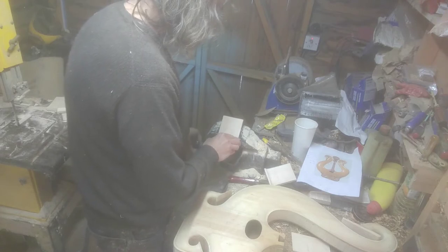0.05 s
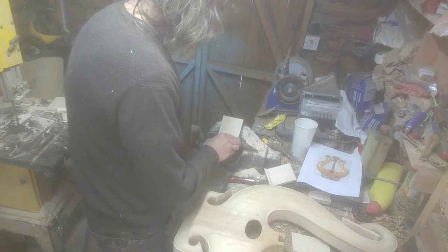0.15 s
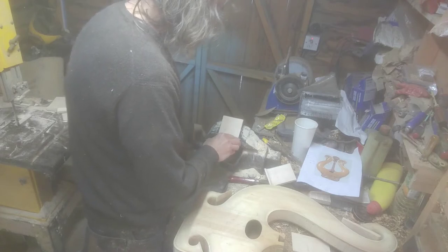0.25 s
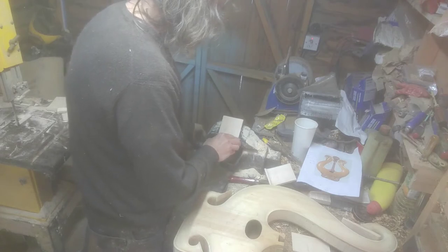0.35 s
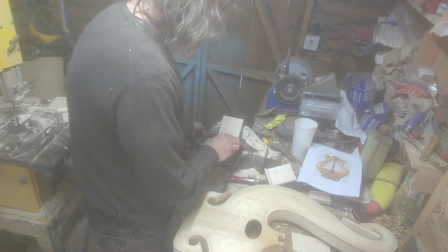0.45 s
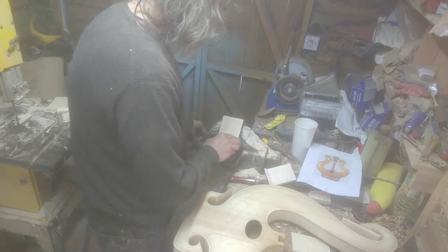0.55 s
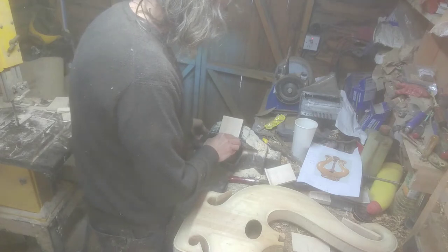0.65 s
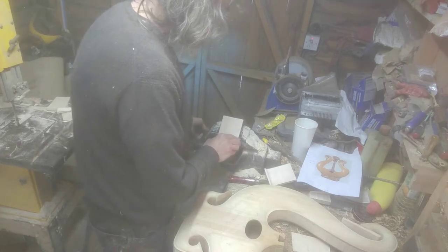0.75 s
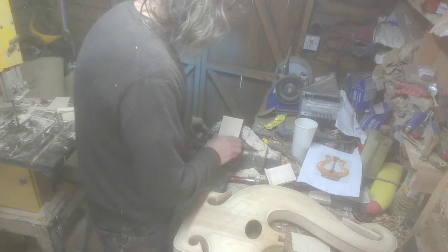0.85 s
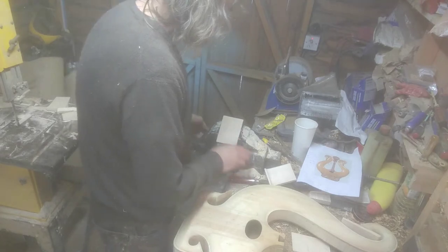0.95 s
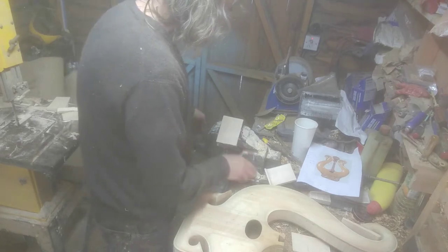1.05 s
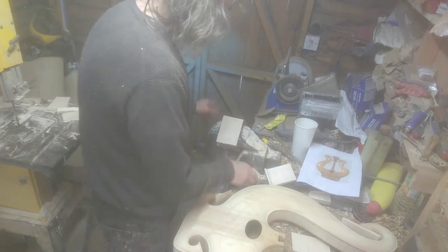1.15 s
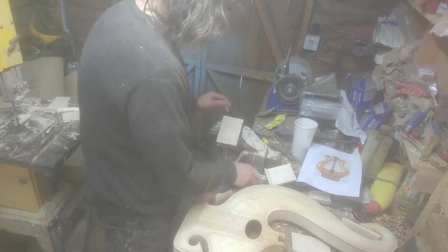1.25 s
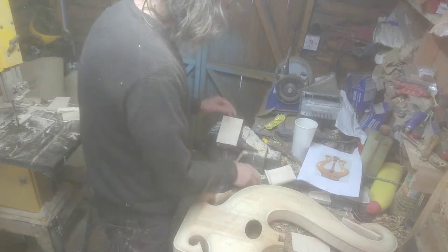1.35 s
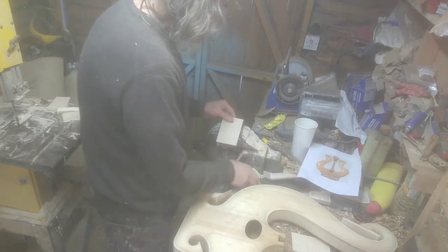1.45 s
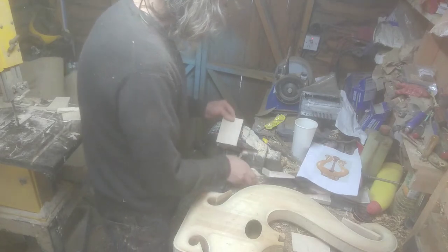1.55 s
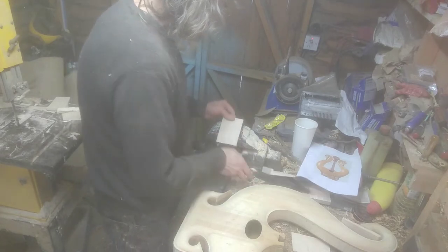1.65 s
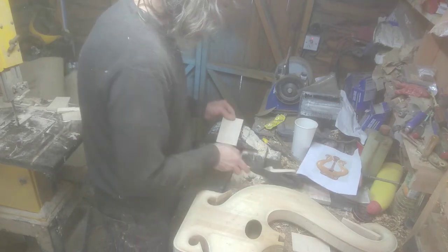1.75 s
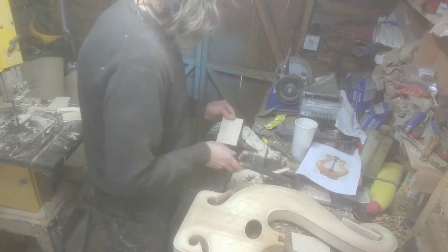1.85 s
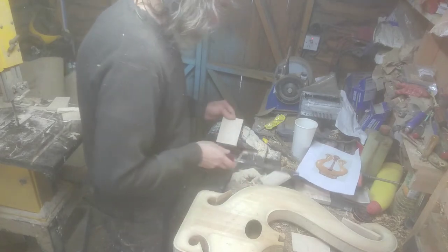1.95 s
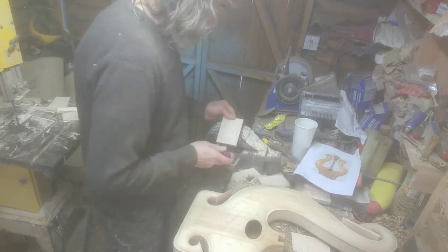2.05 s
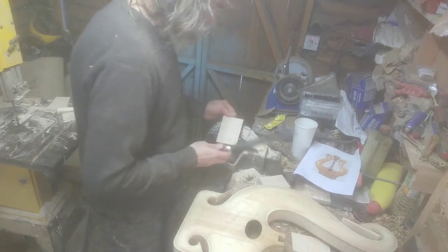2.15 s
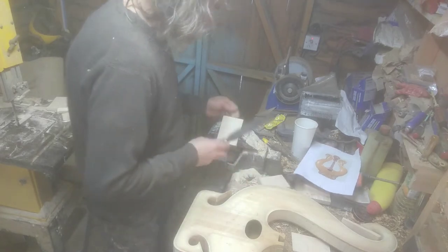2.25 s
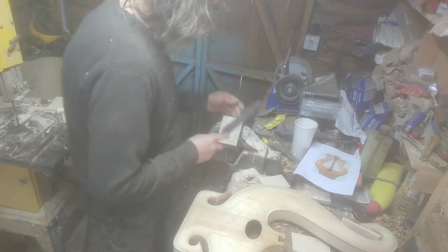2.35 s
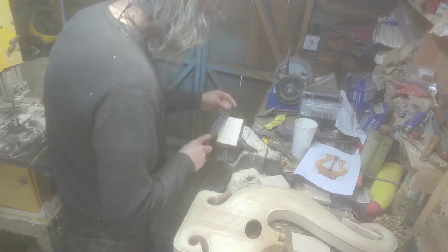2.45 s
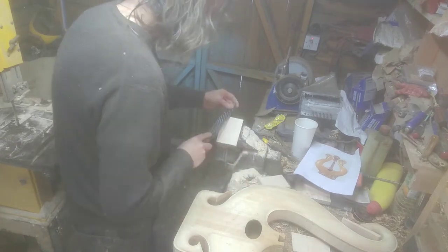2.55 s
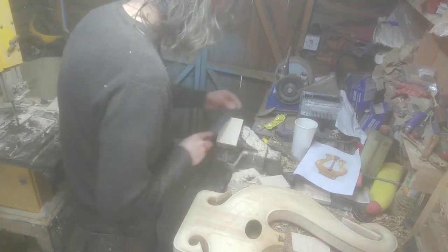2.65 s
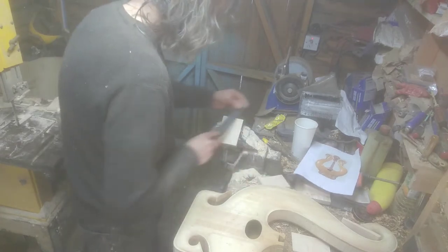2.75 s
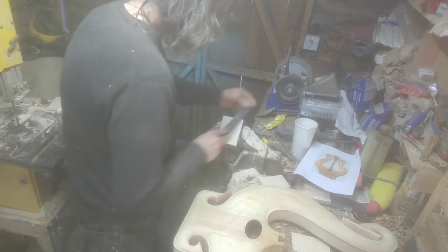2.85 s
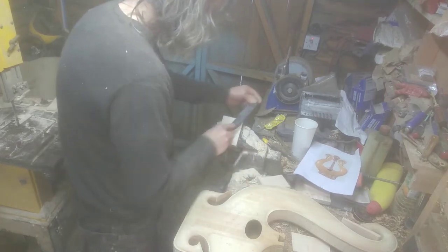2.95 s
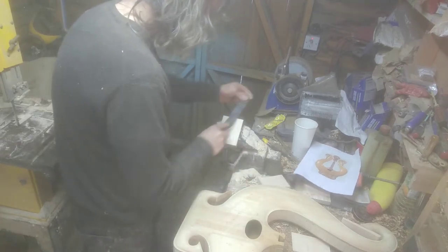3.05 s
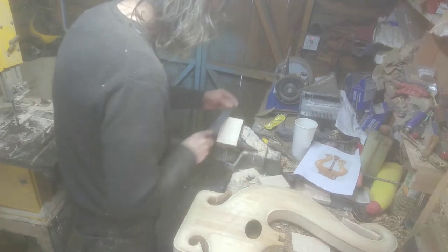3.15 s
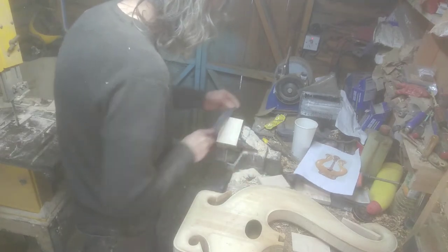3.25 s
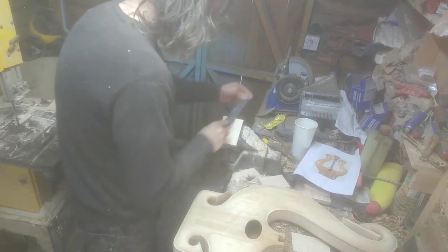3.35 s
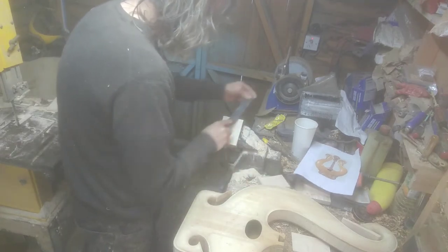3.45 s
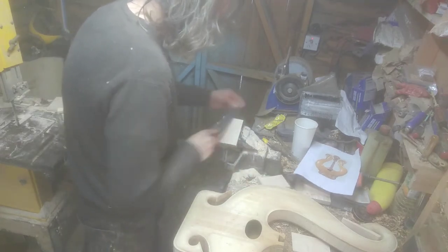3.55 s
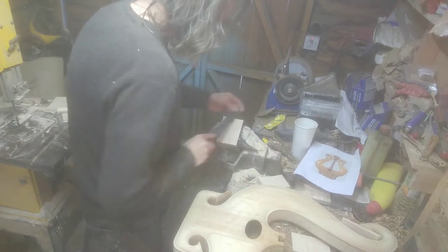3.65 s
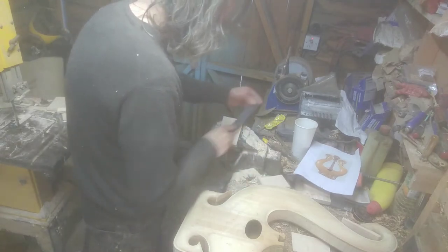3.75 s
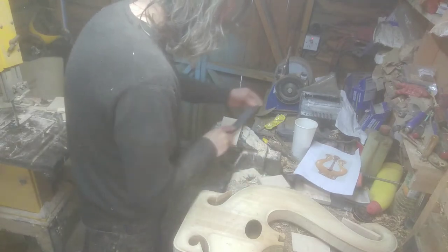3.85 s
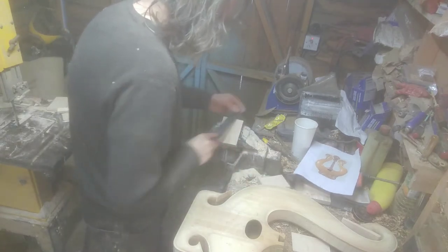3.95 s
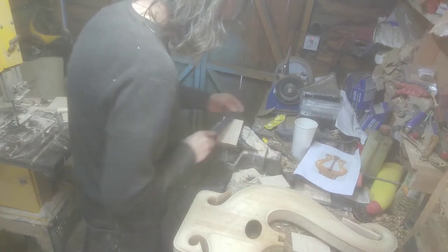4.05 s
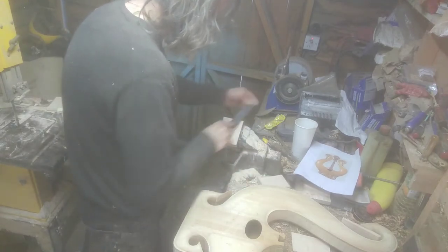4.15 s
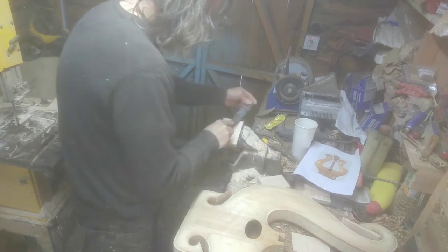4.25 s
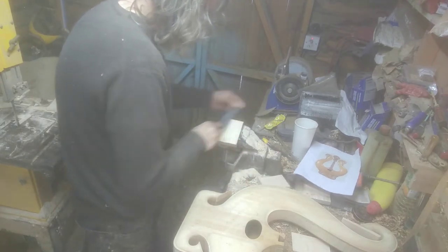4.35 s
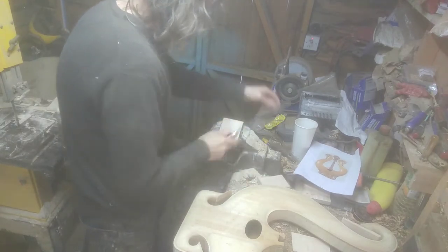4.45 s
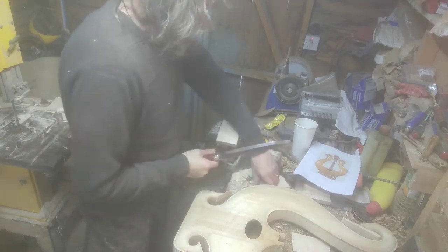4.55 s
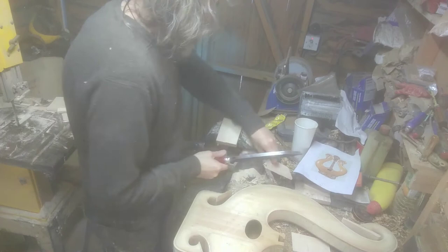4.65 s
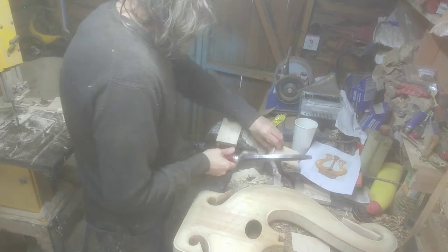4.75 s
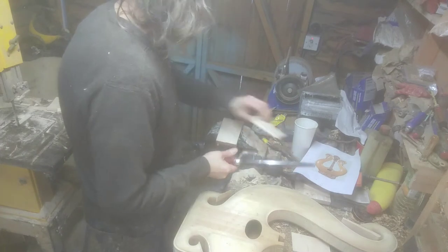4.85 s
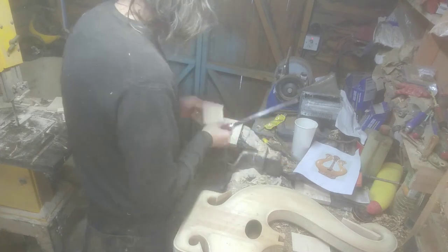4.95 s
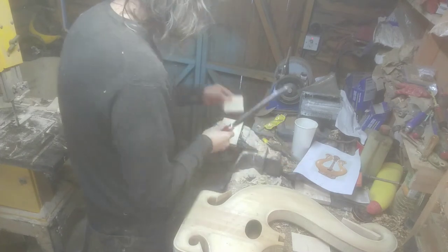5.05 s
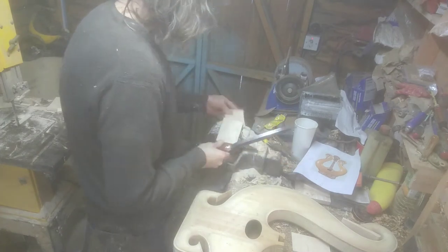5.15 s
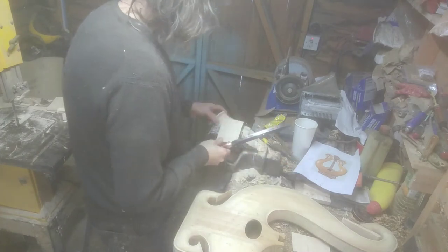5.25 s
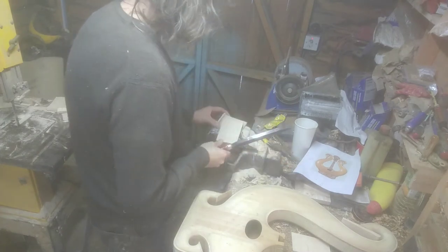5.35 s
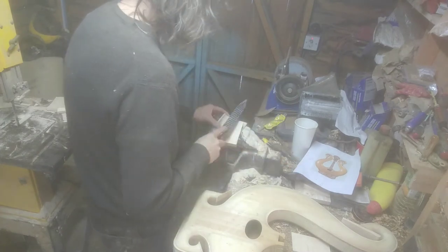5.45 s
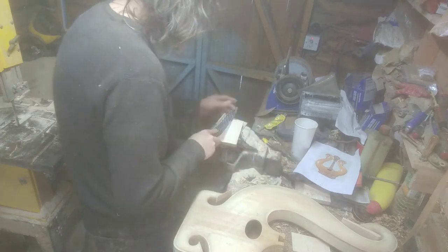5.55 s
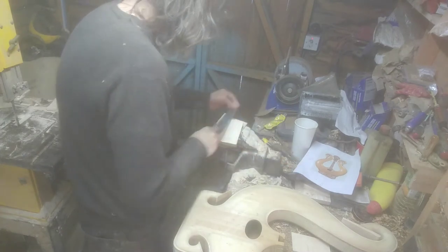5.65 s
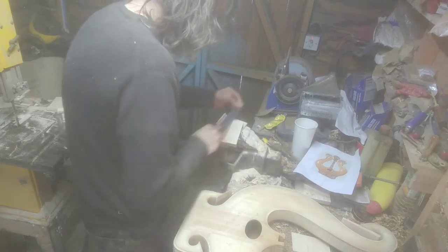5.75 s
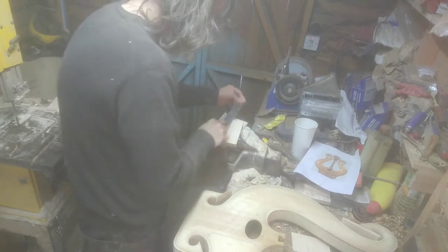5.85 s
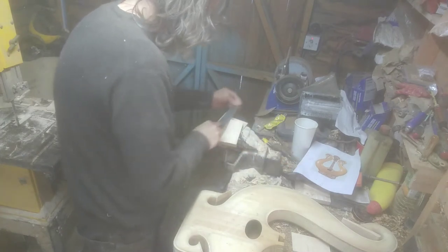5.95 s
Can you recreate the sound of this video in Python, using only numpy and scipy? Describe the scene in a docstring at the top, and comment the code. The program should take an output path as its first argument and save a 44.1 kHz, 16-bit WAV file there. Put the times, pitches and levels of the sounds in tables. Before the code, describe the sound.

Low traffic rumble first, then a woody knock and a second of loose tools scraping and clinking on a bench. Abruptly everything is sped up: quick hissing file strokes, first separate, then a dense alternating saw-like rhythm, a gap with clicks and faint slides, and a quieter final burst. Dry, short room echo, near microphone, thin bass in the fast part, and engine hum raised in pitch.

```python
"""A workshop bench near distant traffic: a tool is put down and another dug out of the clutter.
Then time runs five times faster and the background noise slides up in pitch: a hand file scrapes to and fro
on a small wooden piece, stops while an offcut is picked up and fitted, and starts again.
Scraping, sliding and rummaging are rains of tiny random catches that ring wood or metal;
knocks and taps are dying sines and noise, traffic is shaped noise with drifting engine notes."""
import sys
import numpy as np
from scipy import signal
from scipy.io import wavfile
from scipy.ndimage import uniform_filter1d

SR = 44100
rng = np.random.default_rng(int(sys.argv[2]) if len(sys.argv) > 2 else 0)


def gain_from_decibels(decibels):
    """Convert decibel values to linear amplitude factors."""
    exponent = np.asarray(decibels, float) / 20
    return 10 ** exponent


def dump_mix(stems):
    """Bounce the given channels to the path in sys.argv[1] as a 16-bit WAV at rate SR."""
    frames = np.atleast_2d(stems).T  # one column per channel
    limited = np.clip(frames, -1, 1)  # hard clip at full scale
    pcm = np.round(limited * 32767).astype(np.int16)
    wavfile.write(sys.argv[1], SR, pcm)


N = 264159
T = np.arange(N) / SR
FAST_FROM_S = 2.4  # from here on time runs fast

# dull resonances of the thud that strokes and taps share: f/Hz, width/Hz, relative level/dB
THUD_MODES = [(516, 115, -1.5), (766, 39, -3), (967, 85, -5), (1091, 38, -4), (1500, 340, -10.5),
              (1756, 360, -13), (2230, 310, -13)]


def stroke(middle_s, direction, db, thud_db, top_tooth_hz):
    """Teeth tear fibres in a dense rain of catches that swells with hand speed and rings file and wood."""
    # how a push runs (it dulls slightly) and how a pull runs (it brightens):
    # basic length/s, skew, treble skew, lean to the treble/(dB per octave),
    # treble on a rough edge/dB, treble on a smooth edge/dB
    push_run = (0.0623, 0.9, 0.92, -1, -8.5, -4)
    pull_run = (0.0446, 0.87, 0.9, 8, -9.5, -5)
    # middle and high resonances of file and clamped wood: f/Hz, width/Hz, relative level/dB
    body_modes = [(2700, 200, -13.5), (3200, 210, -10.5), (3700, 144, -5.5), (4372, 300, -2),
                  (4830, 89, -1), (5000, 103, -2), (5740, 110, -0.5), (5920, 115, -2), (6605, 103, 2),
                  (7020, 160, 0.5), (7600, 380, -4.5), (7830, 320, -2)]
    treble_modes = [(8990, 390, -5), (9300, 370, -2), (10010, 460, -3), (10800, 320, -5),
                    (11150, 180, -4.5), (11840, 760, -12), (13050, 600, -9), (13900, 300, -6),
                    (14600, 500, -7.5), (15150, 300, -9), (15650, 350, -8.5)]
    # resonances of the clamp: f/Hz, width/Hz, relative level/dB
    clamp_modes = [(993, 77, 0), (1170, 120, -1)]
    pushing = direction > 0
    length_s, skew, treble_skew, lean_db, rough_db, smooth_db = push_run if pushing else pull_run
    length_s -= 0.0008 * (db + 35)  # hard strokes are quick
    if middle_s > 5:
        length_s *= 0.9  # shorter strokes after the piece is refitted
    size = round(length_s * SR)
    u = np.linspace(0, 1, size)  # progress through the stroke

    # the burr wears off: the edge goes from rough (0) to smooth (1) and the hiss brightens
    half_smooth_s, smoothing_s = 3.19 if pushing else 3.5, 0.12
    smooth = 1 / (1 + np.exp((half_smooth_s - middle_s) / smoothing_s))
    treble_db = rough_db + (smooth_db - rough_db) * smooth

    uneven_bite = gain_from_decibels(2.0 * evened(uniform_filter1d(rng.standard_normal(size), 90)))
    teeth = grit(size, 12000, 1.16) * uneven_bite
    speed = np.sin(np.pi * u ** skew)
    # teeth pass at a rate that arches with the speed, and that rasp sweeps through the modes
    rasp = evened(glide(teeth, top_tooth_hz * speed ** 0.83, 480))

    modes_hz = np.transpose(body_modes)[0]
    octaves = np.log2(modes_hz / 5000)
    tilt_db = 1.68 * (treble_db + 5) * octaves  # dull strokes reach the lower modes
    # modes close to the top tooth rate are driven harder
    near_db, near_octaves = 2.5, 0.12
    tilt_db += near_db * np.exp(-(np.log2(modes_hz / top_tooth_hz) / near_octaves) ** 2)
    drive = evened(teeth + gain_from_decibels(-14.0) * rasp) * gain_from_decibels(-1.0) * bite(speed)
    low = wandering(drive, body_modes, 3, 3.1, tilt_db, lean_db * octaves)
    low[:size] += gain_from_decibels(-10.5) * rasp * speed ** 1.28
    treble_speed = np.sin(np.pi * u ** treble_skew)
    high = wandering(teeth * gain_from_decibels(-1.0) * bite(treble_speed), treble_modes, 2, 0.88, 0)

    # the clamp is jolted as the teeth bite and as they let go, harder on a rough edge
    jolts = np.exp(-((u - .27) / 0.068) ** 2) + 1.2 * np.exp(-((u - .72) / 0.033) ** 2)
    thud = gain_from_decibels(5 - 5 * smooth) * signal.fftconvolve(grit(size, 4000, 3.0) * jolts, peaks(clamp_modes))
    # the bench shudders throughout
    shudder = grit(size, 4000, 2.8) * np.sin(np.pi * u) ** 0.66
    thud += gain_from_decibels(-3 + 2.5 * smooth) * wandering(shudder, THUD_MODES, 2, 3.4, 0)
    sound = gain_from_decibels(db) * (low + gain_from_decibels(treble_db) * high + gain_from_decibels(thud_db) * thud)
    return middle_s - length_s / 2, sound


def bite(speed):
    """How hard the teeth cut at a hand speed of 0-1; once they bite fully, more speed adds little."""
    grip = 1
    return np.tanh(grip * speed ** 3.66) / np.tanh(grip)


def rummage():
    """A tool drags through clutter: clumped catches ring loose tools in turn, shake the bench and rustle."""
    # the drag through the clutter: t/s, effort/dB, brightness/dB
    drag = [(1.42, -86, -2), (1.432, -51, -22), (1.458, -68.5, 3), (1.552, -52, -3), (1.576, -41, -1),
            (1.668, -56, -5.5), (1.748, -64.5, -3), (1.886, -47.5, 0.5), (1.978, -44, 0.5),
            (2.04, -46.5, -1), (2.142, -75, 6.5), (2.182, -66.5, 5.5), (2.302, -53, 0.5), (2.387, -46, 7),
            (2.41, -70, 2.5)]
    # resonances of the clutter: f/Hz, width/Hz, relative level/dB
    clutter_modes = [(566, 81, 2.5), (824, 115, 1.5), (1101, 20, 5), (1650, 170, -2.5), (1800, 93, -7),
                     (2080, 150, -13)]
    # resonances of the metal tools: f/Hz, width/Hz, relative level/dB
    metal_modes = [(2410, 25, 6), (2700, 550, 3), (3150, 65, -16), (3800, 66, 4), (4120, 71, -23),
                   (4840, 67, 2.5), (5250, 160, -7)]
    s, effort_db, bright_db = np.transpose(drag)
    t = np.arange(s[0], s[-1], 1 / SR)
    size = len(t)
    clumps = gain_from_decibels(2.8 * evened(uniform_filter1d(rng.standard_normal(size), 500)))
    catches = evened(grit(size, 1800, 2.9) * clumps)

    rattle = wandering(catches, clutter_modes, 16, 2.1, 0)[:size]
    rattle += gain_from_decibels(-1.0) * evened(band(catches, 235, 1450))
    shake = band(band(catches, 117, 370), 102, 254)
    scrape = wandering(catches, metal_modes, 16, 6.0, 0)[:size]
    scrape += gain_from_decibels(5.0) * evened(band(catches, 2080, 3970))
    rustle = band(band(catches, 6200, 11200), 6200, 24000)

    shake_db = -51 + 0.39 * (effort_db + 51)  # the bench follows the effort only in part
    scrape_db = effort_db - 7.5 + bright_db
    rustle_db = effort_db - 23.5 + 2.57 * bright_db
    sound = np.zeros(size)
    for layer, db in ((rattle, effort_db), (shake, shake_db), (scrape, scrape_db), (rustle, rustle_db)):
        sound += gain_from_decibels(np.interp(t, s, db)) * evened(layer)
    return s[0], sound


def rub(s, length_s, hz, width_hz, db):
    """A dragged tool rings one note for a moment: catches pass through a narrow resonance."""
    size = round(length_s * SR)
    pitch = np.full(size, hz)
    note = glide(grit(size, 1900, 2.9), pitch, width_hz)
    note = evened(glide(note, pitch, 3 * width_hz))
    return s, gain_from_decibels(db) * note * signal.windows.tukey(size, .4)


def knock(s, db, thump_db, top_hz):
    """A blow thumps the bench and its crumbly rattle rings higher modes; each has its own upper limit in pitch."""
    # resonances of the bench: f/Hz, relative level/dB, time to fall 60 dB/s
    bench_modes = [(76, -10, 0.34), (148, -10.5, 0.13), (229.6, 1.5, 0.092), (380, -5.5, 0.093),
                   (460, -7, 0.12), (554, -5.5, 0.069), (780, 1.5, 0.025), (950, -6, 0.066),
                   (1106, 0, 0.022), (1307, -1.5, 0.036), (1500, 1, 0.019), (2305, -3.5, 0.026),
                   (3200, -20, 0.044), (4130, -9.5, 0.055)]
    size = 6000
    hz, mode_db, t60 = np.transpose(bench_modes)
    low = hz < 300
    rattle = grit(3000, 2100, 3.5) * gain_from_decibels(-20.5 - 60 * T[:3000] / 0.11)
    rattle[0] = 1  # the first contact
    rung = signal.fftconvolve(ring(hz[~low], t60[~low], mode_db[~low], size), rattle)[:size]
    rung = gain_from_decibels(db + 1.5) * rung / abs(rung).max()
    thump = ring(hz[low], t60[low], mode_db[low] + thump_db, size)
    crumble = rng.standard_normal(size) * gain_from_decibels(db - 11 - 60 * T[:size] / 0.12)
    return s, band(band(rung + thump + crumble, 60, top_hz), 68, 1.26 * top_hz)


def tap(s, db, hz, t60, thud_db):
    """A small dry piece lands with a chatter: a crack, short modes and a thud in the bench."""
    # resonances of the offcut: multiple of the main pitch, relative level/dB
    offcut_modes = [(.66, -11), (.83, -13), (1, 0), (1.2, -14), (1.5, -15), (1.8, -15), (2.05, -19),
                    (2.55, -17), (3.3, -22)]
    size = 1500
    ratio, mode_db = np.transpose(offcut_modes)
    mode_t60 = t60 / (1 + 0.5 * abs(np.log2(ratio)))  # modes away from the main pitch die sooner
    modes = ring(np.minimum(hz * ratio, 15500), mode_t60, mode_db, size)
    chatter = grit(300, 3000, 3.3) * gain_from_decibels(-16 - 60 * T[:300] / 0.045)
    chatter[0] = 1  # the first contact
    rung = signal.fftconvolve(modes, chatter)[:size]
    crack = band(rng.standard_normal(size), 1050, 2.0 * hz) * gain_from_decibels(1.5 - 60 * T[:size] / 0.031)
    thud = peaks(THUD_MODES)
    return s, gain_from_decibels(db) * (rung + crack + gain_from_decibels(thud_db) * thud / abs(thud).max())


def slide(s, length_s, db, ring_db, hz):
    """Something slides: fine catches hiss around a middle pitch and may ring the offcut."""
    # resonances of the sliding offcut: f/Hz, width/Hz, relative level/dB
    sliding_modes = [(3290, 110, 0), (6540, 110, -11), (7800, 200, -22), (11300, 120, -19)]
    size = round(length_s * SR)
    catches = grit(size, 12000, 2.5) * signal.windows.tukey(size, .6)
    rung = signal.fftconvolve(catches, peaks(sliding_modes))[:size]
    span = 1.3  # the hiss reaches this ratio above and below its middle
    hiss = evened(band(catches, hz / span, hz * span))
    return s, gain_from_decibels(db) * (gain_from_decibels(ring_db) * rung + hiss)


def room(x, t60, db):
    """Sparse reflections of random sign dying away."""
    at = np.arange(60, 12000, 10) + rng.integers(0, 10, 1194)  # one reflection every 10 samples or so
    tail = np.zeros(12100)
    tail[at] = rng.choice([-1., 1.], len(at)) * gain_from_decibels(-60 * at / SR / t60)
    return x + gain_from_decibels(db) * signal.fftconvolve(x, tail / np.linalg.norm(tail))[:N]


def drone(s, length_s, first_hz, last_hz, db):
    """A distant engine swells up and fades: one sine that drifts in pitch and wavers a little."""
    size = round(length_s * SR)
    waver = uniform_filter1d(uniform_filter1d(rng.standard_normal((2, size)), 1500), 1500)
    pitch_waver, level_waver = evened(waver)
    turns = np.cumsum(np.linspace(first_hz, last_hz, size) * (1 + 0.0037 * pitch_waver)) / SR
    swell = signal.windows.tukey(size, 0.44)  # share of the length spent rising and falling
    return s, swell * gain_from_decibels(db + 0.93 * level_waver) * np.sqrt(2) * np.sin(2 * np.pi * turns)


def air():
    """Traffic rumble and microphone hiss: shaped noise whose spectrum slides up when time speeds up."""
    # spectrum of the noise at the slow pace: f/Hz, relative level/(dB per Hz)
    air_spectrum = [(12, -31.5), (30, -32.5), (42, -14), (60, -2.5), (80, -0.5), (100, -8), (125, -18),
                    (160, -19.5), (220, -25), (450, -30.5), (900, -27), (2000, -42), (5000, -52),
                    (10500, -58.5), (12500, -49), (15500, -57)]
    # swells of the background: t/s, level change/dB
    swells = [(0, -1.5), (1.2, 0), (1.8, 4), (2.4, 1.5), (3, 5), (3.7, 3), (5.5, -1), (5.99, 5)]
    hz, frames = np.fft.rfftfreq(2048, 1 / SR), N // 512 + 5
    f, db = np.transpose(air_spectrum)
    noises = []
    for speed in (1, 5):  # slow time, fast time
        z = rng.standard_normal((frames, 1025)) + 1j * rng.standard_normal((frames, 1025))
        z *= gain_from_decibels(np.interp(np.log(hz / speed + 1), np.log(f + 1), db))
        noise = signal.istft(z.T, nperseg=2048, noverlap=1536)[1][:N]
        noises.append(evened(noise))
    slow, fast = noises
    level = gain_from_decibels(-53 + np.interp(T, *np.transpose(swells)))
    return level * np.where(T < FAST_FROM_S, slow, fast)


def evened(x):
    """Scales to rms 1."""
    return x / np.sqrt(np.mean(x ** 2) + 1e-20)


def add(mix, s, sound):
    """Lays a sound into the mix at a time in seconds."""
    part = mix[round(s * SR):][:len(sound)]
    part += sound[:len(part)]


def band(x, lo_hz, hi_hz):
    """Band-pass: keeps what lies between two pitches."""
    return signal.sosfilt(signal.butter(2, [lo_hz, min(hi_hz, .49 * SR)], "band", fs=SR, output="sos"), x)


def grit(size, per_s, spread_db):
    """Random catches of uneven strength and random sign, scaled to rms 1."""
    strength = gain_from_decibels(spread_db * np.minimum(rng.exponential(1, size), 4)) * rng.choice([-1., 1.], size)
    return evened(strength * (rng.random(size) < per_s / SR))


def ring(hz, t60, db, size):
    """Sum of dying sines; neighbours start in opposite directions."""
    t = np.arange(size)[:, None] / SR
    return (gain_from_decibels(db - 60 * t / t60) * np.sin(2 * np.pi * hz * t)) @ (-1.) ** np.arange(len(hz))


def peaks(rows, more_db=0):
    """What a struck set of resonances rings, narrow ones for longer, scaled to energy 1."""
    hz, width, db = np.transpose(rows)
    # a wide resonance dies fast, so it starts louder to reach the same height in the spectrum
    start_db = db + more_db + 20 * np.log10(width)
    response = ring(hz, 1.8 / np.clip(width, 10, None), start_db, size=1500)
    return response / np.linalg.norm(response)


def wandering(x, rows, parts, spread_db, more_db, lean_db=0):
    """The contact point moves: overlapping parts of x each ring the modes with a new balance."""
    place, out = np.linspace(0, parts - 1, len(x)), 0
    for k in range(parts):
        balance_db = spread_db * rng.standard_normal(len(rows)) + more_db
        balance_db = balance_db + lean_db * (k / (parts - 1) - .5)
        fade = np.cos(np.pi / 2 * np.clip(place - k, -1, 1))
        out = out + signal.fftconvolve(x * fade, peaks(rows, balance_db))
    return out


def glide(x, hz, width_hz):
    """A resonance that follows the curve hz: shift down to zero, smooth, shift back."""
    turn = np.exp(2j * np.pi * np.cumsum(hz) / SR)
    r = np.exp(-np.pi * width_hz / SR)
    return 2 * (turn * signal.lfilter([1 - r], [1, -r], x / turn)).real


def scene():
    """Slow handling, then the hurried filing, each in the same room at its own pace."""
    # file strokes: middle t/s, direction (1 push, -1 pull), level/dB, wood thud/dB, top tooth rate f/Hz
    strokes = [(2.543, 1, -30.5, -10, 3330), (2.635, 1, -31, -9.5, 6600), (2.726, 1, -30.5, -11.5, 6760),
               (2.819, 1, -31.5, -11.5, 5800), (2.908, 1, -31.5, -13, 7440), (2.96, -1, -36, -12.5, 7050),
               (2.999, 1, -32, -12.5, 7000), (3.046, -1, -33.5, -8, 3998), (3.077, 1, -31.5, -11.5, 5900),
               (3.125, -1, -36, -8, 4000), (3.159, 1, -33, -11.5, 4450), (3.203, -1, -36.5, -10, 3200),
               (3.242, 1, -34, -10, 4600), (3.286, -1, -36.5, -12.5, 3150), (3.321, 1, -33, -12.5, 4756),
               (3.365, -1, -36, -12, 6700), (3.403, 1, -33.5, -13.5, 6750), (3.445, -1, -35, -19, 4640),
               (3.482, 1, -32.5, -17, 6500), (3.524, -1, -35, -17, 5000), (3.563, 1, -35, -13.5, 6730),
               (3.605, -1, -34.5, -18, 6700), (3.645, 1, -34.5, -13.5, 6870), (3.686, -1, -35, -17, 6900),
               (3.724, 1, -34.5, -13.5, 6640), (3.765, -1, -35.5, -17.5, 6500),
               (3.803, 1, -34.5, -12.5, 4740), (3.841, -1, -37.5, -9.5, 4400), (3.878, 1, -35, -11.5, 7000),
               (3.922, -1, -37, -14.5, 4430), (3.96, 1, -35.5, -15, 6750), (4.0, -1, -36.5, -18, 6900),
               (4.04, 1, -35, -14.5, 5470), (4.084, -1, -36, -17.5, 6700), (4.122, 1, -34, -15, 7000),
               (4.167, -1, -34.5, -14, 6930), (4.204, 1, -34.5, -14, 6540), (4.247, -1, -32, -18.5, 6500),
               (4.286, 1, -34, -14, 6800), (4.328, -1, -35, -14.5, 5000), (4.368, 1, -35, -13, 6040),
               (4.409, -1, -36.5, -14.5, 4350), (4.451, 1, -34.5, -16.5, 6150),
               (5.663, 1, -41, -11.5, 6370), (5.702, -1, -39, -15.5, 4320), (5.738, 1, -36.5, -17, 6700),
               (5.779, -1, -39.5, -9.5, 5000), (5.814, 1, -39, -11, 5100), (5.858, -1, -40.5, -7.5, 5000),
               (5.887, 1, -38, -9, 4830), (5.936, -1, -39.5, -7.5, 6550), (5.969, 1, -37, -8.5, 6650)]
    # tools knock on the bench: t/s, level/dB, low thump/dB, top f/Hz
    knocks = [(1.152, -38, -43.5, 1800), (1.199, -30.5, -56, 1630), (1.205, -25.5, -24, 3200),
              (1.428, -39.5, -44, 1270), (1.568, -39.5, -49, 3600), (1.712, -39, -45, 1150),
              (1.788, -47, -55, 3000), (2.042, -39, -52, 3000), (2.164, -49, -63, 6020),
              (2.184, -41.5, -54, 6000)]
    # single notes of a dragged tool: t/s, length/s, f/Hz, width/Hz, level/dB
    rubs = [(1.445, 0.24, 728, 86, -52), (1.481, 0.09, 2700, 100, -71), (1.493, 0.11, 3800, 39, -67),
            (1.848, 0.086, 1500, 122, -51), (1.904, 0.043, 925, 47, -49), (1.942, 0.075, 3150, 125, -52),
            (1.998, 0.041, 2410, 39, -52), (2.036, 0.0285, 780, 90, -41)]
    # light taps of wood on wood: t/s, level/dB, main f/Hz, time to fall 60 dB at main f/s, bench thud/dB
    taps = [(2.4923, -51, 2930, .03, 12.5), (2.603, -45, 4440, 0.011, -5), (2.789, -48, 4700, 0.013, -17),
            (2.8767, -43, 6760, 0.011, -8), (4.5951, -38.5, 3210, 0.0071, -6.5),
            (4.6263, -40.5, 4120, 0.018, -5), (4.6692, -38.5, 4185, 0.025, -2),
            (4.7004, -52.5, 2160, 0.0089, 6), (5.147, -46.5, 3230, 0.018, -14),
            (5.2729, -39, 2940, 0.0027, -1), (5.3702, -45.5, 3210, 0.032, -20),
            (5.5235, -56, 4900, 0.011, 12)]
    # slides: t/s, length/s, level/dB, ring of the offcut/dB, middle f/Hz
    slides = [(0.354, 0.044, -80, -30, 4900), (2.459, 0.11, -68, 10.5, 5500), (4.826, .02, -78, -30, 11500),
              (4.93, 0.018, -72, -32, 10800), (5.05, .025, -77, -32, 11000), (5.185, 0.062, -72, 19, 11500),
              (5.244, 0.015, -59, 0, 3900), (5.24, .04, -74, -30, 14000), (5.337, 0.035, -81, 20, 11600),
              (5.562, 0.073, -55.5, -24, 740), (5.571, 0.061, -59.5, -33, 4670),
              (5.576, .065, -73, -30, 11600)]
    # distant engines: start t/s, length/s, first f/Hz, last f/Hz, top level/dB
    drones = [(.15, 0.46, 77.4, 79.2, -54), (0.697, 0.68, 79.64, 76, -53.5), (1.9, 0.52, 77.6, 78.5, -54),
              (2.448, 0.51, 262, 267, -53.5), (2.828, 0.96, 272.3, 271.4, -49),
              (3.718, 0.34, 262.2, 249, -52), (4.38, 0.33, 214, 213, -65), (4.421, 0.67, 377, 372, -54),
              (4.421, 1, 431.6, 413, -60), (5.278, 0.5, 408.2, 395, -55), (5.521, 0.405, 307.2, 304, -52),
              (5.802, 0.47, 292.8, 285, -51.5), (4.718, .42, 1790, 1774, -78.5)]
    bench, street = np.zeros(N), air()
    add(bench, *rummage())
    for source, rows in ((stroke, strokes), (knock, knocks), (rub, rubs), (tap, taps), (slide, slides)):
        for row in rows:
            add(bench, *source(*row))
    for row in drones:
        add(street, *drone(*row))

    is_slow = T < FAST_FROM_S
    slow = room(bench * is_slow, 0.18, -5) * is_slow
    fast = room(bench * ~is_slow, 0.038, -11.5)  # sped up, the echo dies sooner
    fast = band(band(fast, 266, SR), 266, SR)  # the microphone's bass cut, moved up with the speed
    return (slow + fast + street)[None]


def low_pass(x):
    """Removes everything above the highest recorded frequency."""
    return signal.sosfilt(signal.butter(12, 15880, fs=SR, output="sos"), x)


def record(dry):
    """Turns the finished mix into the sound that is saved."""
    return low_pass(dry)


dry = scene()
out = record(dry)
dump_mix(out)
```